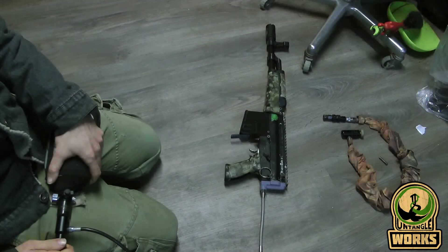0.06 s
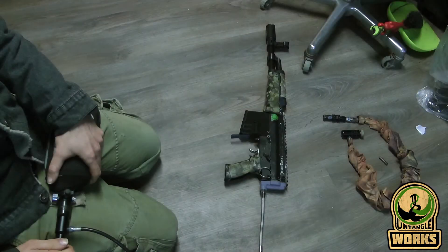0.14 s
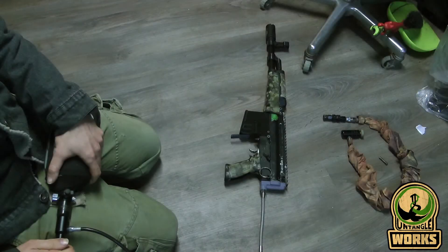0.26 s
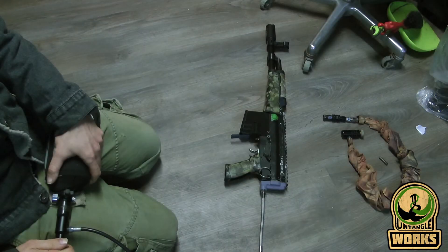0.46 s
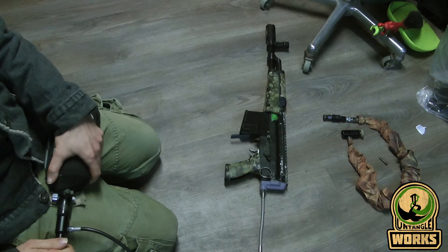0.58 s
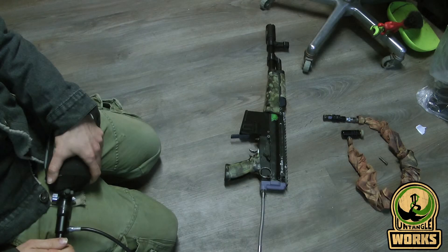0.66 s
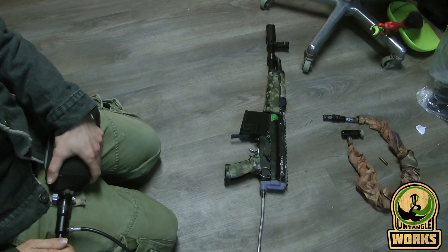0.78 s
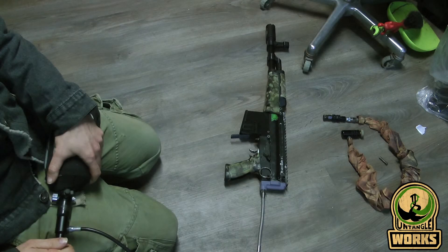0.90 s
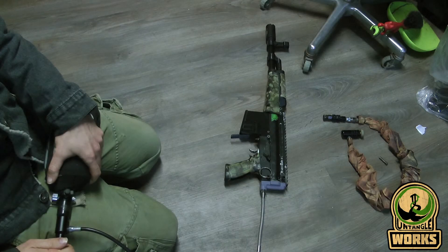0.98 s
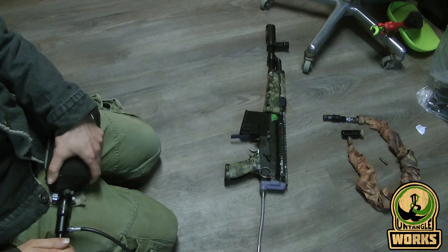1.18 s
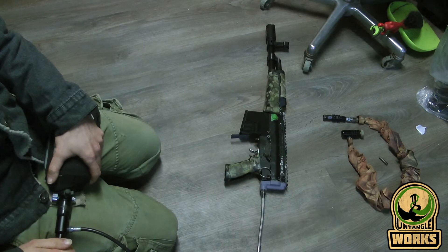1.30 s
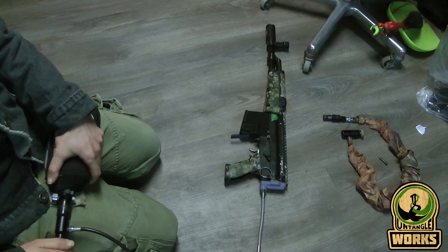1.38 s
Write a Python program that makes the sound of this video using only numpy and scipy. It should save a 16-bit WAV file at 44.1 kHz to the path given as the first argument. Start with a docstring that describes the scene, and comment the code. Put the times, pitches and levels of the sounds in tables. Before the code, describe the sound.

Compressed air pops sharply as a tank valve opens, then hisses softly indoors.

```python
"""A valve on a compressed-air tank is opened in a small room, over a faint low rumble. First air seeps.
At 0.21 s the valve snaps over with a sharp burst that rings the metal fittings, and air rushes into
the hose. The rush dies away as the hose fills, and from about 0.43 s a steady leak hiss takes over.
Last, the tank is shifted with four soft bumps while the leak hisses on."""
import sys
import numpy as np
from scipy import signal
from scipy.fft import rfft, irfft
from scipy.io import wavfile

SR = 44100
rng = np.random.default_rng(int(sys.argv[2]) if len(sys.argv) > 2 else 0)


def put_to_file(sound):
    """Save the sound as 16-bit audio at rate SR, in the file named by the first command-line argument."""
    columns = np.atleast_2d(sound).T  # one column per channel
    safe = np.clip(columns, -1, 1)
    whole_steps = np.round(safe * 32767)
    wavfile.write(sys.argv[1], SR, whole_steps.astype(np.int16))


N = 63945

SNAP_S, SNAP_RISE_S = 0.2124, 0.00031
NEAR_SIDE_DB, ROOM_SIDE_DB = -28, -19  # stereo width: lower is narrower


def valve_burst():
    """Escaping air gives a low push, a crack and a blast that fades in the room; the valve ticks home."""
    # tone of the blast: pitch_hz, level_db
    blast_tone = [(100, -18), (220, -13.5), (350, -4), (600, -3.5), (780, 4), (920, -27), (1150, 5),
                  (1550, -15), (1800, -2.5), (2700, -0.5), (3100, -11), (3450, 3), (4300, 3.5), (4900, -9),
                  (5700, -5.5), (7000, -10.5), (9200, -7.5), (10400, -18), (15500, -12)]
    # time the blast takes to fall 60 dB in the room: pitch_hz, fade_s
    blast_fades = [(200, 0.32), (600, 0.22), (1500, 0.18), (4000, 0.27), (8000, 0.25), (14000, 0.15)]
    # tone of the first crack: pitch_hz, level_db
    crack_tone = [(200, -20), (400, 5.5), (650, 1), (1500, -5), (2600, -4.5), (3500, -0.5), (4900, -1),
                  (6300, 4), (8500, -3.5), (10500, -18), (15500, -22)]
    t, spectrum = since(SNAP_S), rfft(air(blast_tone, side_db=-10.5))
    pitches, fades = np.transpose(blast_fades)
    blast = 0
    for share, fade_s in zip(np.eye(len(fades)), fades):  # each band fades at its own speed
        weight = read(np.c_[pitches, share], bins())
        blast += irfft(spectrum * weight, N) * amp(-60 * t / fade_s)
    blast *= amp(-23.5) * np.minimum(t / SNAP_RISE_S, 1)
    crack = amp(-16.5) * air(crack_tone, NEAR_SIDE_DB) * puff(SNAP_S, SNAP_RISE_S, decay_s=0.0032)
    push_t, push_s, push_hz = since(SNAP_S - 0.0013), 0.00065, 590
    push_swell = push_t / push_s * np.exp(1 - push_t / push_s)
    push = -amp(-21.5) * push_swell * np.sin(2 * np.pi * push_hz * push_t)
    tick = amp(-27) * band(centre_hz=12000) * puff(0.2415, SNAP_RISE_S, decay_s=0.00062)
    return blast + crack + push + tick


def shock_click():
    """The steep pressure front as the valve snaps over makes one sharp click."""
    # tone of the pressure front: pitch_hz, level_db
    click_tone = [(200, -23), (600, -11), (1300, -2), (2600, 6), (3800, -23), (5000, -18), (6500, 2),
                  (8600, -8), (10500, -18), (15500, -17)]
    start_s = SNAP_S + 0.0005
    click = irfft(amp(read(click_tone, bins())) * np.exp(-2j * np.pi * bins() * start_s), N)
    return amp(-15) * click / abs(click).max()


def ringing_fittings():
    """The jump in pressure rings the metal; the room makes each note waver."""
    # notes of the metal: pitch_hz, level_db, fade_s (time to fall 60 dB)
    metal_notes = [(615.3, -32, 0.12), (700, -37, .13), (1122.3, -23, 0.21), (1144, -27.5, 0.14),
                   (1213, -41, .17), (1399, -31.5, 0.16), (2120, -44, 0.38), (3000, -49, 1),
                   (3300, -31.5, 0.27), (3378, -23.5, 0.11), (3880, -50, 0.13), (4130, -37.5, 1.08),
                   (4140, -34, 0.24), (4300, -36, 0.14), (5240, -37.5, 0.27), (6000, -52.5, 0.78),
                   (6777, -41, 0.14), (7410, -36, 0.14), (8460, -34.5, .17), (8580, -38, 0.13)]
    t, ring = since(SNAP_S), 0
    for pitch_hz, level_db, fade_s in metal_notes:
        wander = [drift(rate_hz=95) + 1j * drift(rate_hz=95) for _ in range(2)]
        waver = 1 + 0.24 * spread(wander, ROOM_SIDE_DB)  # moves both level and phase
        note = np.exp(2j * np.pi * (pitch_hz * t + rng.random()))
        ring += amp(level_db - 60 * t / fade_s) * (waver * note).imag
    return ring * np.minimum(t / SNAP_RISE_S, 1)


def hollow(x, notch_hz=947, width_hz=293, low_cut_hz=260):
    """Cuts a narrow dip near 950 Hz from the snap, and thins the bass."""
    notched = signal.lfilter(*signal.iirnotch(notch_hz, notch_hz / width_hz, SR), x)
    return signal.lfilter(*signal.butter(2, low_cut_hz, "high", fs=SR), notched)


def filling_hose(sag_db_per_s=17.5, full_s=0.54, release_s=0.046):
    """Air seeps past the valve, then rushes into the hose and eases off as the pressure evens out."""
    # tone of the rushing air: pitch_hz, level_db
    rush_tone = [(700, -17.5), (1300, -21.5), (1750, -2.5), (2500, -13.5), (3000, -2.5), (3600, -4),
                 (4200, -1), (5200, -5), (6000, 1.5), (7800, -1), (8800, -7), (10300, -13.5), (15500, -24)]
    seep = amp(-54.5) * np.minimum(since(0.177) / 0.016, 1)
    t = since(SNAP_S)
    rush = amp(-46 - sag_db_per_s * t) * np.exp(-since(full_s) / release_s)
    return air(rush_tone, side_db=-16.5) * np.where(t > 0, rush, seep)


def leak(open_s=0.43, rise_s=0.024, treble_hz=2400, treble_lag_s=0.073, fade_db_per_s=1.5):
    """A jet of air at the fitting opens with a spit, brightens and then slowly weakens."""
    # tone of the jet: pitch_hz, level_db
    jet_tone = [(400, -9.5), (950, -14.5), (1250, -12.5), (1580, -10), (1780, -0.5), (2400, 1.5), (3000, 0),
                (3800, -1), (4700, -6), (5400, -4.5), (6300, 2.5), (7500, 1), (8900, -4.5), (10300, -4.5),
                (12300, 0.5), (12850, -3), (13500, -3.5), (14400, -7), (15000, -11), (15700, -4.5)]
    t, jet = since(0), air(jet_tone, side_db=-23.5)
    low = irfft(rfft(jet) / (1 + (bins() / treble_hz) ** 6), N)
    low_in, treble_in = [.5 + .5 * np.tanh((t - open_s - lag) / (2 * rise_s))
                         for lag in (0, treble_lag_s)]
    hiss = (low * low_in + (jet - low) * treble_in) * amp(-51 - fade_db_per_s * since(open_s))
    spit = amp(-53) * band(centre_hz=3830) * np.exp(-((t - 0.518) / 0.008) ** 2)
    return hiss + spit


def hisses():
    """The hose and the leak flutter very slightly and bounce off nearby surfaces."""
    # echoes from nearby surfaces: delay_s, gain
    echoes = [(.00188, -.16), (.00665, 0.33), (.00675, -0.17), (0.0107, .1), (0.0152, .13)]
    direct = (filling_hose() + leak()) * amp(0.06 * drift(rate_hz=41))
    early = sum(gain * np.pad(direct, ((0, 0), (round(delay_s * SR), 0)))[:, :N]
                for delay_s, gain in echoes)
    return direct + early + amp(-5) * room_echo(direct)


def tank_bumps(rise_s=0.007):
    """The tank is shifted and bumps dully against hand and knee."""
    # soft bumps: start_s, level_db, decay_s
    bumps = [(0.636, -60.5, 0.14), (.718, -51, 0.025), (0.741, -52, 0.023), (0.808, -59.5, 0.03)]
    # their dull tone: pitch_hz, level_db
    bump_tone = [(80, -24), (200, -3), (350, 3), (470, -3), (570, 1), (780, -5.5), (930, -23), (2000, -35)]
    loudness = sum(amp(db) * puff(start_s, rise_s, decay_s) for start_s, db, decay_s in bumps)
    return air(bump_tone, side_db=-14) * loudness


def room_echo(x, fade_s=0.29):
    """The small room blurs a sound into a short tail that starts 4 ms later."""
    t = np.arange(SR // 3) / SR
    tail = spread(rng.standard_normal((2, len(t))), ROOM_SIDE_DB) * amp(-60 * t / fade_s) * (t > .004)
    return signal.fftconvolve(x, tail / np.linalg.norm(tail[0]), axes=1)[:, :N]


def room_rumble():
    """The room's background: a steady low rumble with a faint hiss."""
    # tone of the background: pitch_hz, level_db
    rumble_tone = [(20, -10.5), (45, -26), (85, -0.5), (130, -5.5), (200, -0.5), (320, -5), (480, -15),
                   (750, -9.5), (950, -26.5), (1400, -17.5), (2000, -13.5), (2400, -11), (2800, -14.5),
                   (5000, -17.5), (9000, -25.5), (15500, -24)]
    # how alike it is in both ears: pitch_hz, likeness (0 to 1)
    ear_likeness = [(60, 0.85), (300, 0.03), (1500, 0.8), (10000, 1)]
    left, other = rfft(rng.standard_normal((2, N)))
    same = np.clip(read(ear_likeness, bins()), 0, 1)
    right = same * left + np.sqrt(1 - same ** 2) * other
    return amp(-61) * unit(colour(irfft(np.array([left, right]), N), rumble_tone))


def air(tone, side_db):
    """Stereo noise like churning air, at level 1; the tone table sets only its colour."""
    return unit(spread(colour(rng.standard_normal((2, N)), tone), side_db))


def band(centre_hz):
    """Close-up noise, 20 dB weaker from an octave either side of its centre."""
    return air([(centre_hz / 2, -20), (centre_hz, 0), (centre_hz * 2, -20)], NEAR_SIDE_DB)


def puff(start_s, rise_s, decay_s):
    """A loudness curve that rises quickly and dies away."""
    t = since(start_s)
    return np.minimum(t / rise_s, 1) * np.exp(-t / decay_s)


def drift(rate_hz):
    """Smooth random wandering, mostly slower than rate_hz."""
    return unit(irfft(rfft(rng.standard_normal(N)) * np.exp(-(bins() / rate_hz) ** 2) * (bins() > 0), N))


def spread(pair, side_db):
    """A middle signal and a weaker side signal make left and right."""
    return pair[0] + amp(side_db) * np.array([[1], [-1]]) * pair[1]


def colour(x, tone):
    """Turns each pitch up or down by a tone table."""
    return irfft(rfft(x) * amp(read(tone, bins())), N)


def read(points, hz):
    """Reads between a table's rows on a log pitch scale."""
    pitches, values = np.transpose(points)
    return np.interp(np.log(hz + 1), np.log(pitches + 1), values)


def since(start_s):
    """Seconds since the start, zero before it."""
    return np.maximum(np.arange(N) / SR - start_s, 0)


def bins():
    """The pitches of a spectrum, in Hz."""
    return np.fft.rfftfreq(N, 1 / SR)


def amp(db):
    """Turns decibels into a gain."""
    return 10 ** (np.asarray(db) / 20)


def unit(x):
    """Scales to an average (rms) level of 1."""
    return x / np.sqrt(np.mean(x ** 2) + 1e-20)


def scene():
    """Adds the snap, the hisses, the bumps and the background."""
    snap = hollow(valve_burst() + shock_click() + ringing_fittings())
    return snap + hisses() + tank_bumps() + room_rumble()


def record(dry):
    """The left microphone is a little brighter; the highest treble is cut off."""
    # left microphone minus right: pitch_hz, level_db
    balance = [(100, -1.5), (1000, 0.1), (8000, 0.2), (11000, 1.5), (15000, 3.5)]
    tilt = amp(np.array([[.5], [-.5]]) * read(balance, bins()))
    lowpass = signal.firwin(1023, cutoff=15720, window=("kaiser", 9), fs=SR)
    return signal.oaconvolve(irfft(rfft(dry) * tilt, N), lowpass[None], "same")


dry = scene()
out = record(dry)
put_to_file(out)
```